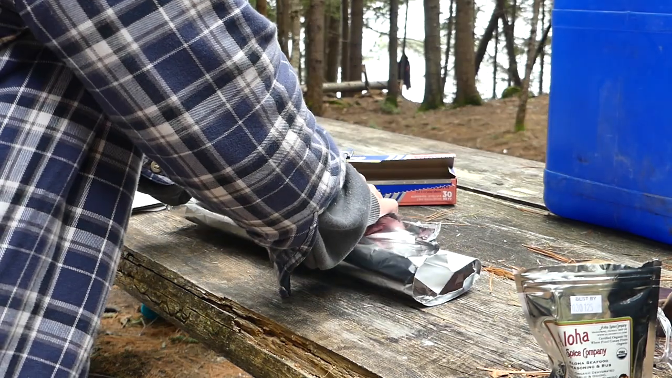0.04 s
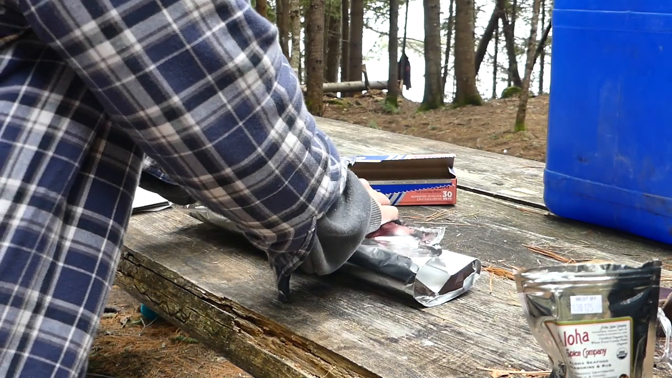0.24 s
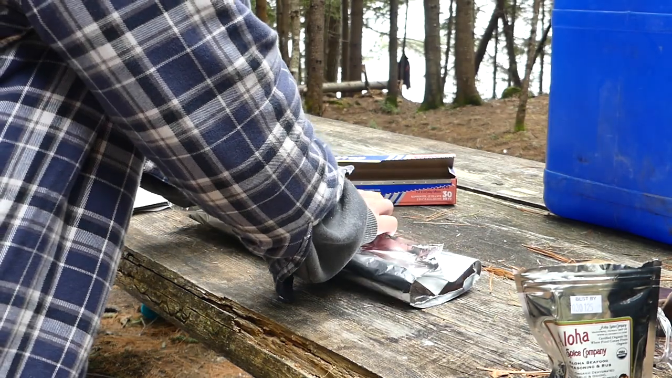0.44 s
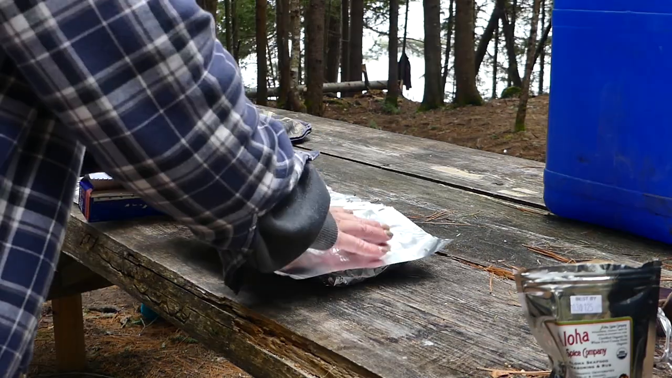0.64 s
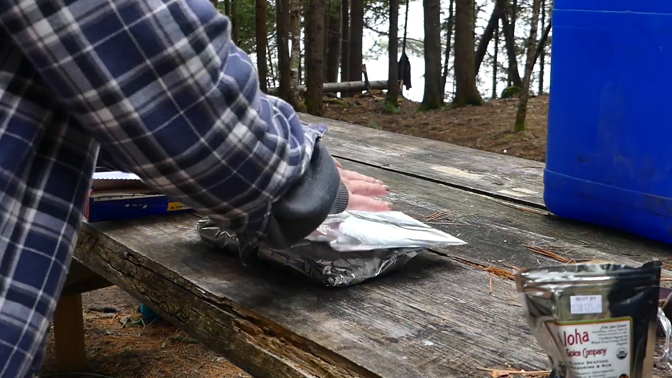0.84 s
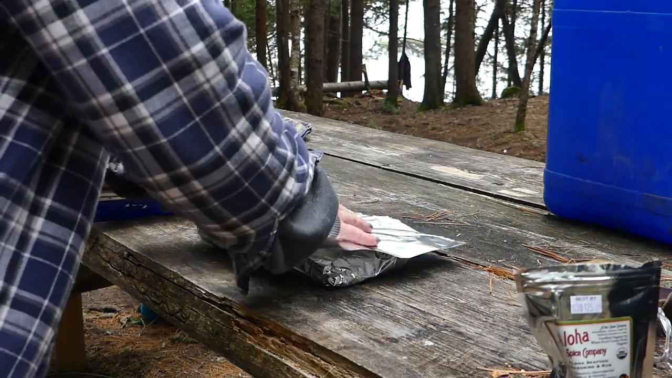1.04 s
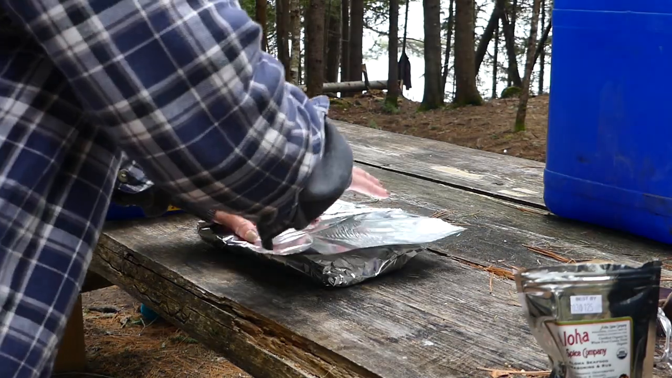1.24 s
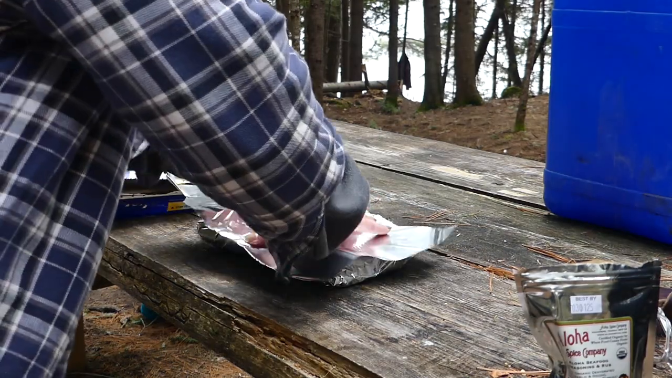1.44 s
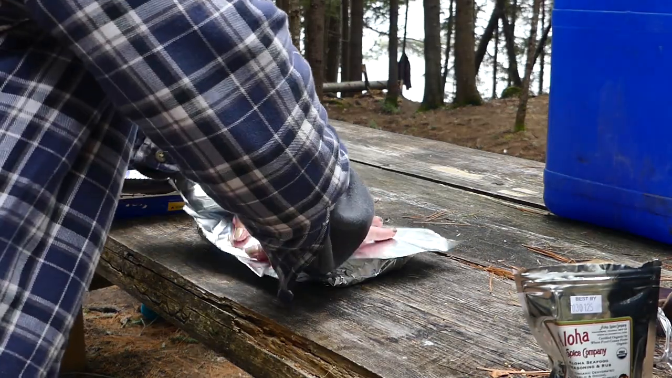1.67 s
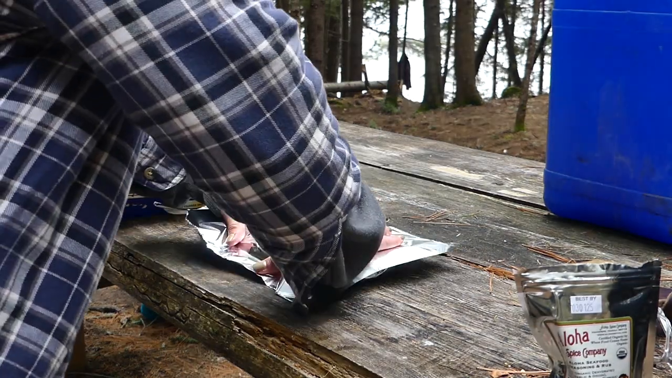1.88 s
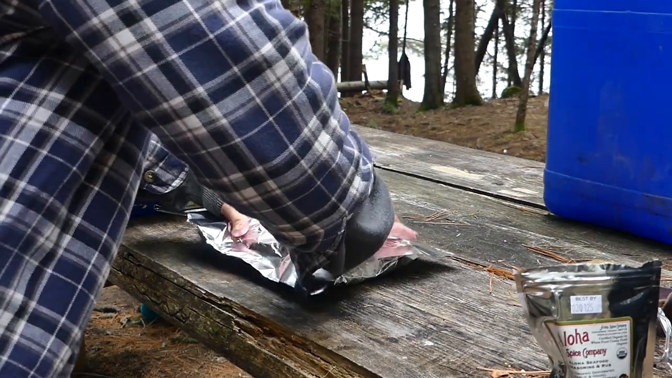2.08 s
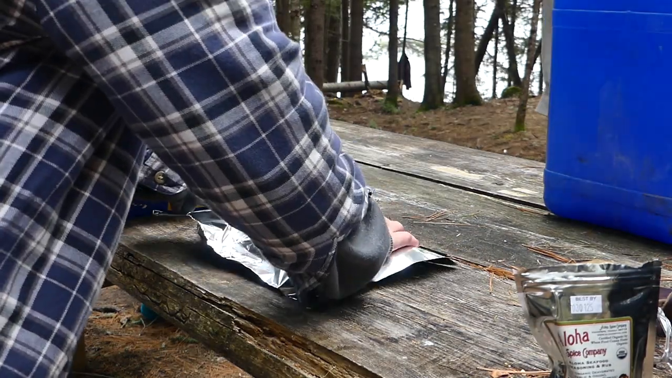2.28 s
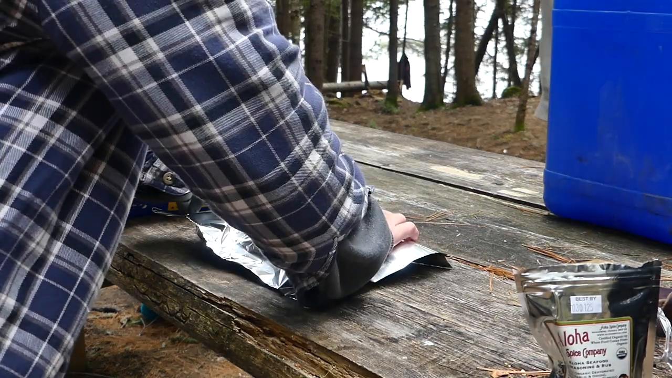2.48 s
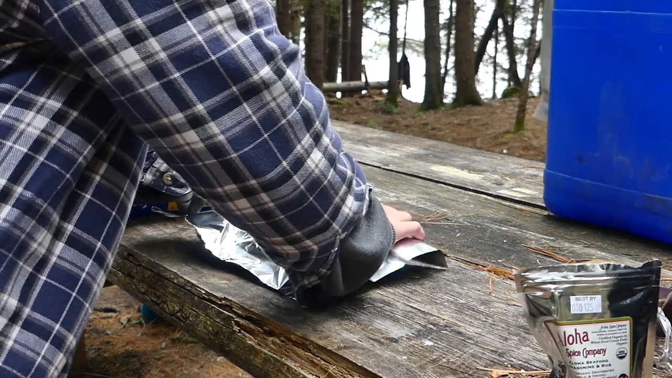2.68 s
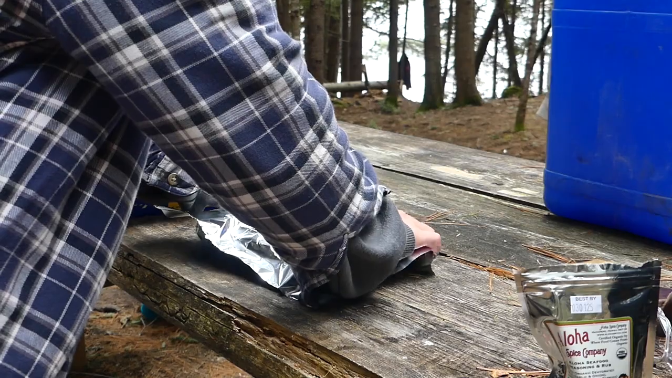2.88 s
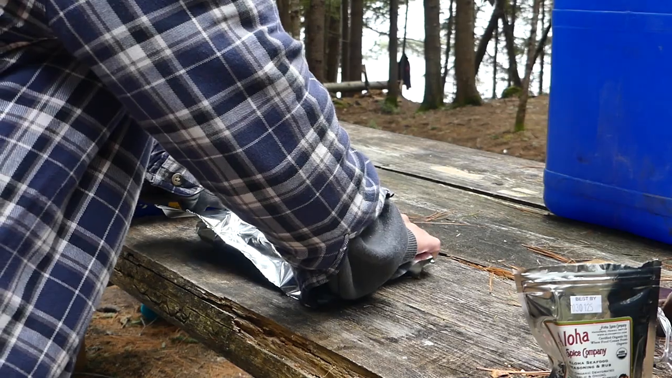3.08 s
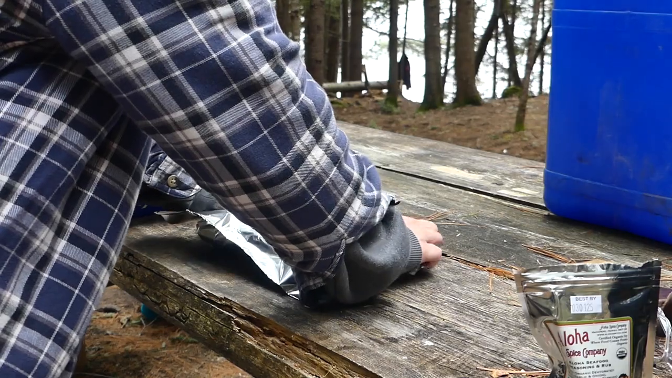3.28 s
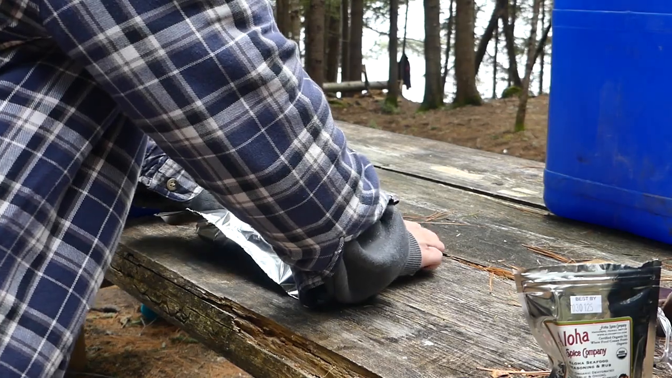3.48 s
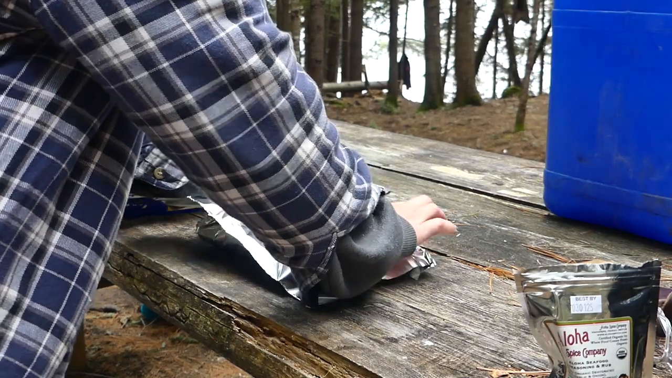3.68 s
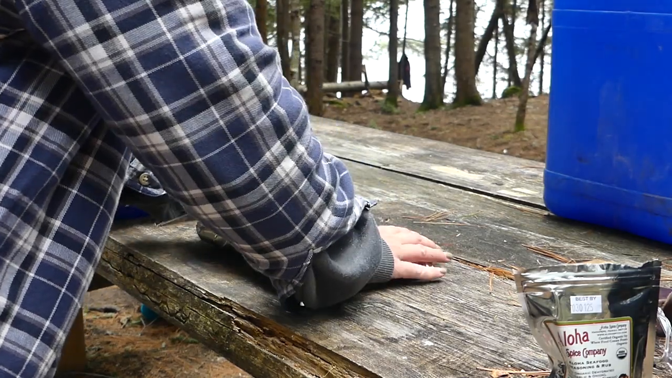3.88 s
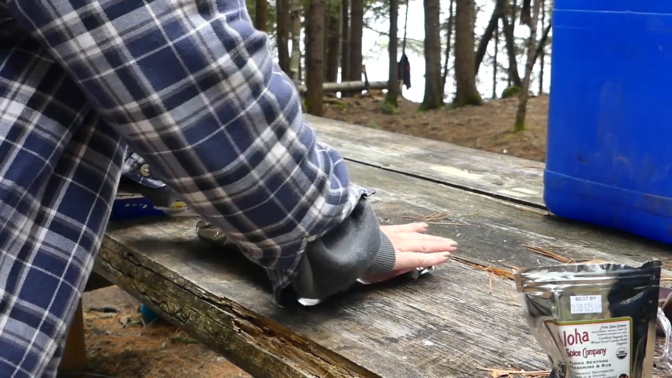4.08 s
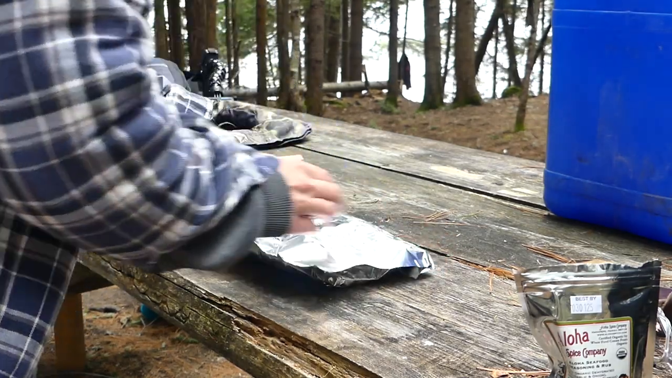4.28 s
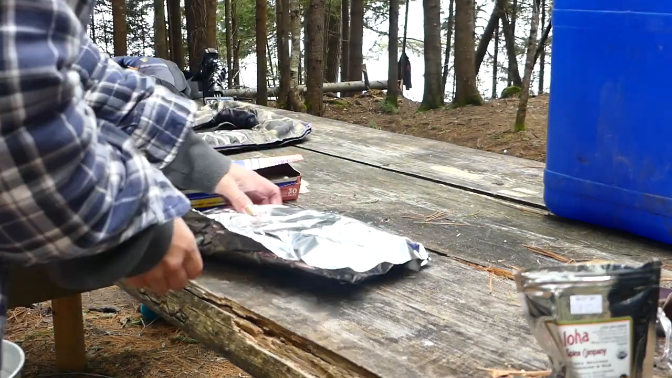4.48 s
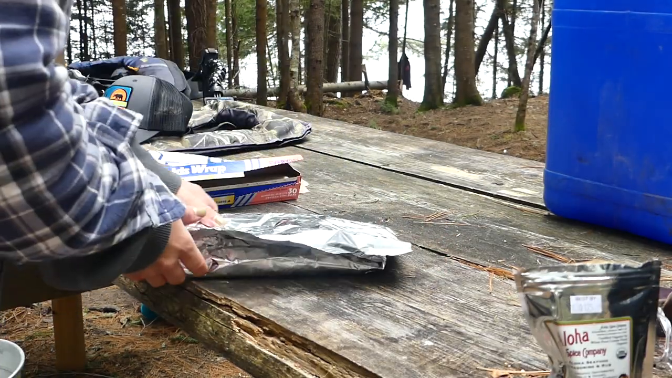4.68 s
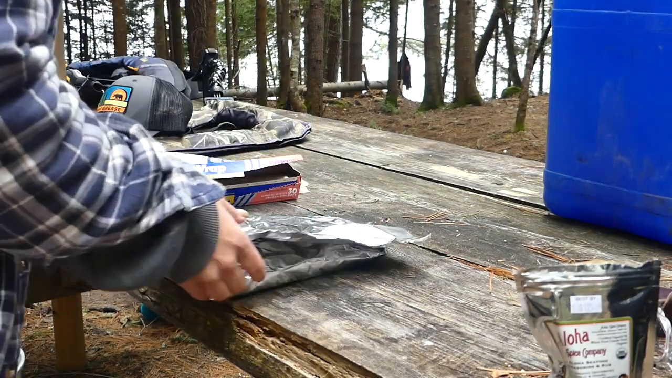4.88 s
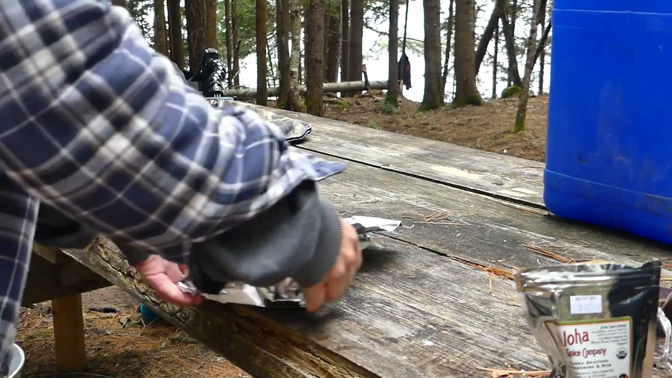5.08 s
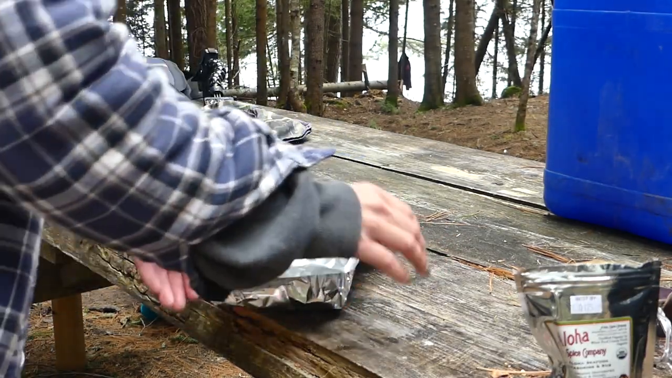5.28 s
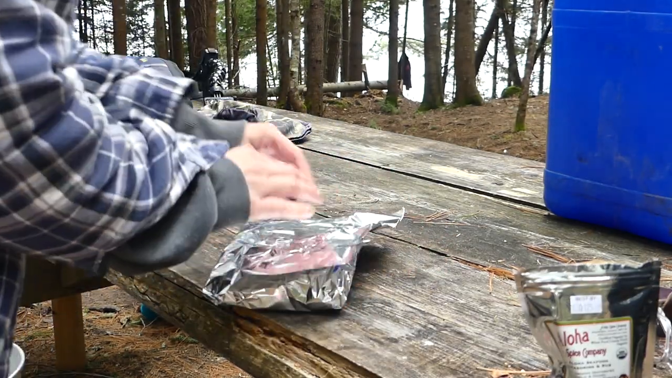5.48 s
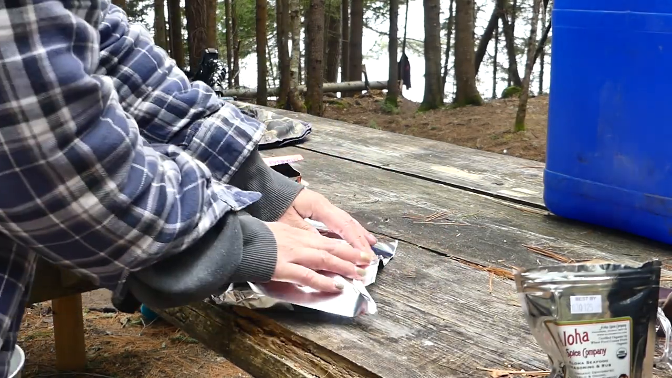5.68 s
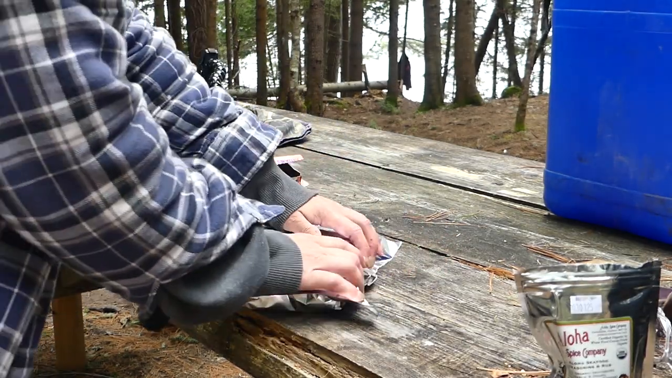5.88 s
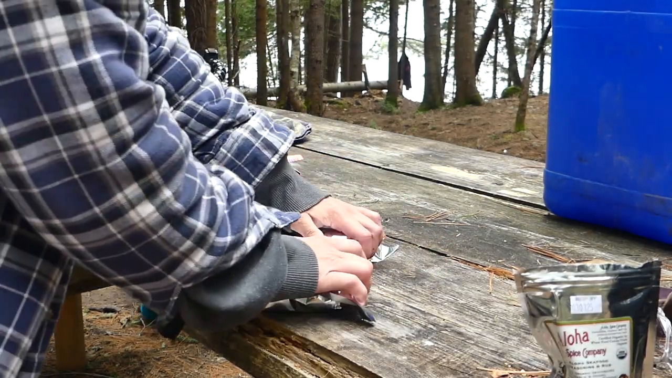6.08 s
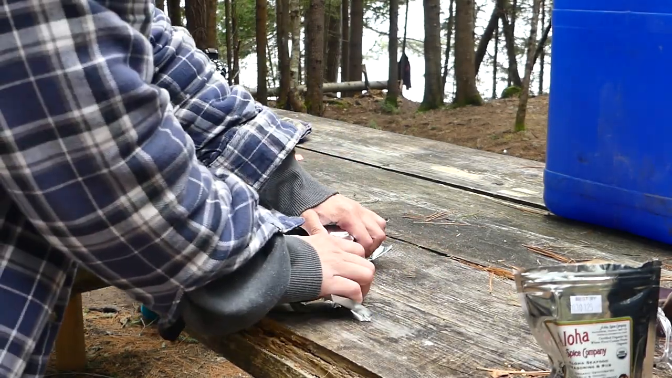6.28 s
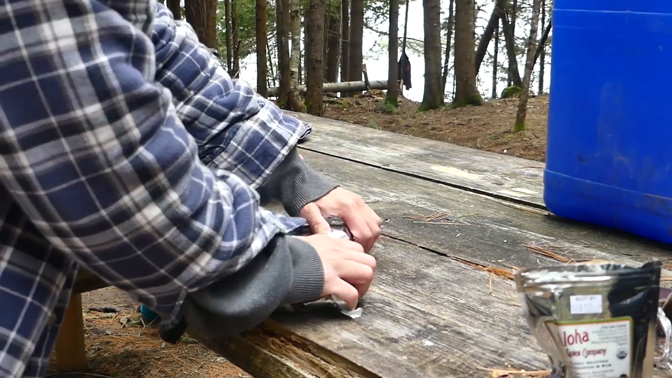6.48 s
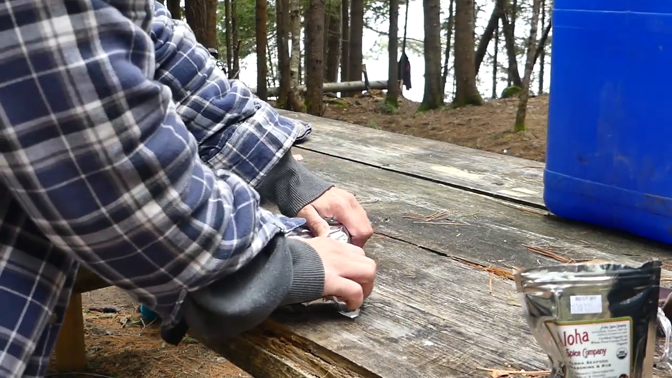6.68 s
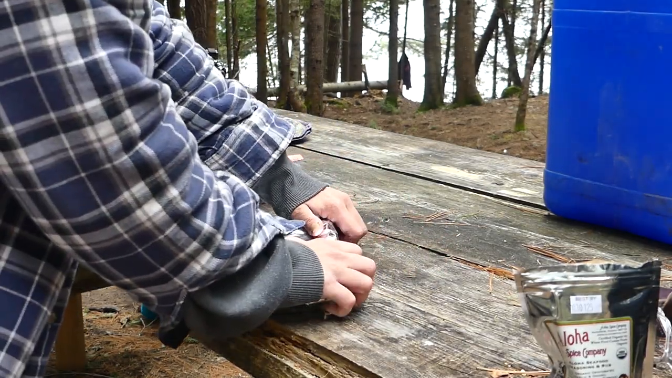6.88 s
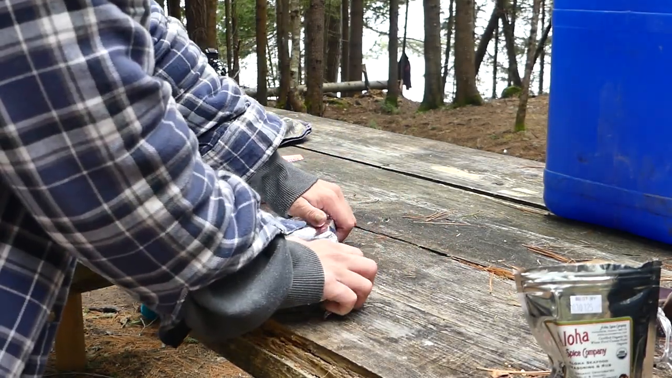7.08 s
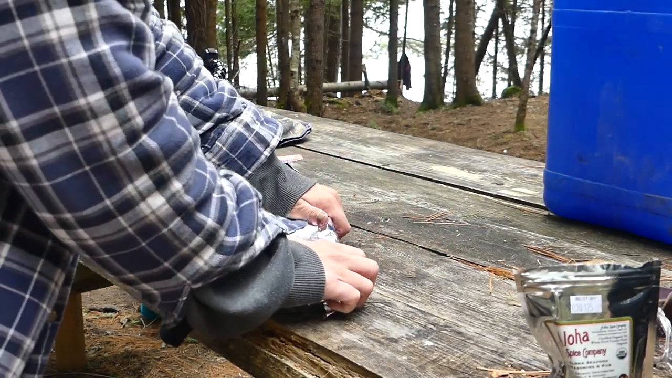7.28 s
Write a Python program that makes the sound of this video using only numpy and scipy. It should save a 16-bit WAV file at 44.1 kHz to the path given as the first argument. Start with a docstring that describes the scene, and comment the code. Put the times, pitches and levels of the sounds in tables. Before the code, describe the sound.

Close, bright foil crackling in short pushes, crisp crease snaps, a packet scraped over boards and knocked, then tight crimping among trees.

```python
"""A soft crinkle comes first, then sharp snaps: hands fold aluminium foil on a wooden table among trees.
Foil crackles by buckling: swarms of tiny rattles and facet rings, with a hiss where it slides.
Creases snap as short noise bursts, kinks tick, panels pop at a pitch, and a tight crimp squeaks.
The packet scrapes and knocks on the table; the boards thud softly under the leaning arms.
Sleeves brush as filtered noise, the trees return a faint diffuse echo, and open air murmurs very faintly."""
import sys
import numpy as np
from scipy import signal
from scipy.io import wavfile
from scipy.ndimage import uniform_filter1d

SR = 44100
rng = np.random.default_rng(int(sys.argv[2]) if len(sys.argv) > 2 else 0)


def log_audio(samples):
    """Write samples as a 16-bit WAV file to the path given in sys.argv[1]."""
    # one column per channel
    frames = np.atleast_2d(samples).T
    # limit to full scale, then quantise
    limited = np.clip(frames, -1, 1)
    pcm = np.round(limited * 32767).astype(np.int16)
    wavfile.write(sys.argv[1], SR, pcm)


N = 323694
TIME = np.arange(N) / SR  # [s]

# Open air, spectrum: (frequency [Hz], level [dB])
AIR_SPECTRUM = [(20, -4), (80, -11.5), (200, 25), (400, 14), (800, 19.5), (1500, 0), (3000, -71),
                (8000, -106), (16000, -19)]
AIR_DB = -81
# Flannel sleeves brushing as the arms move: (time [s], level [dB])
SLEEVE_LEVEL = [(0, -54), (.45, -53), (.55, -52), (.85, -54.5), (1.08, -48.5), (1.4, -57), (1.72, -45),
                (2.0, -51), (2.3, -50.5), (2.8, -53.5), (3.7, -52.5), (3.9, -52.5), (4.3, -52), (5.2, -55),
                (5.36, -51), (5.5, -47.5), (5.7, -52.5), (6.5, -51), (7.34, -52.5)]
# Flannel, spectrum: (frequency [Hz], level [dB])
SLEEVE_SPECTRUM = [(30, -14), (90, -12), (160, 1), (280, 2), (450, 0.5), (800, -1.5), (1400, -2.5),
                   (2500, -9), (8000, -27), (16000, -61)]
# Reverberation among the trunks: (frequency [Hz], 60 dB decay time [s])
WOODS_DECAY = [(100, 1), (1000, 0.42), (4000, 0.18), (8000, 0.08), (16000, 1)]
# Hands leaning on the table: (time of greatest weight [s], width between 1/e points [s], level [dB])
TABLE_LEANS = [(.59, .16, -51), (1.375, 0.54, -52), (2.12, 0.27, -55), (2.6, .5, -61), (3.2, 0.38, -55.5),
               (3.63, 0.3, -56), (4.2, 0.75, -50), (4.72, 0.42, -51), (5.076, .1, -50), (5.354, 0.22, -53),
               (5.68, 0.19, -45.5), (6.102, 0.42, -48.5), (6.303, .18, -53), (6.82, 0.63, -46.5),
               (7.3, 0.19, -55)]
RESTING_DB = -72.5  # the boards under the resting arms
# Table top, spectrum: (frequency [Hz], level [dB])
TABLE_SPECTRUM = [(10, -22), (25, -4), (37, 0), (50, -6), (62, -7.5), (90, -14), (160, -22), (400, -34),
                  (2000, -70)]
# Packet dragged over the boards: (time [s], level [dB])
DRAG_LEVEL = [(3.95, -54), (4.3, -48), (4.42, -35), (4.52, -39), (4.62, -29.5), (4.87, -31.5), (4.91, -51),
              (4.98, -34), (5.1, -36.5), (5.22, -48)]
# Hollow resonances of the packet: (frequency [Hz], bandwidth [Hz], level [dB])
HOLLOW_MODES = [(866, 22, 0), (1130, 15, -4), (1243, 28, 2), (1324, 48, 7), (1390, 64, 6), (1477, 55, 4),
                (1580, 120, -8), (1960, 72, -4)]
# Packet's edge striking the table: (time [s], chatter level [dB], contact length [s], decay [s])
EDGE_KNOCK = (5.2985, -9.5, .0026, .0006)
# Chatter of the knock, spectrum: (frequency [Hz], level [dB])
CHATTER_SPECTRUM = [(100, -36), (800, -16), (1800, -4), (2500, 2), (3700, -5), (5000, 2), (8300, -3),
                    (10500, -11), (13500, -9), (16000, -22)]
# First dull push of the knock, spectrum: (frequency [Hz], level [dB])
PUSH_SPECTRUM = [(30, -16), (200, 0), (450, -3), (1300, -2), (2200, -8), (5000, -30), (16000, -50)]
# Foil catching on foil in a tight crimp: (time [s], level [dB], fall to 1/e [s])
CRIMP_SQUEAKS = [(6.792, -19, .003), (6.802, -21, 0.0092), (6.811, -12.5, 0.0034), (6.814, -14, 0.011),
                 (6.827, -24, .009)]
# Squeaks, spectrum: (frequency [Hz], level [dB])
SQUEAK_SPECTRUM = [(100, -48), (4000, -22), (5800, -10), (6650, 3), (7400, -7), (8300, -8.5), (9500, -21),
                   (12500, -13), (16000, -20)]
# Wide panels popping through: (time [s], level before trim [dB], pitch [Hz])
PANEL_POPS = [(0.267, -36, 1320), (.362, -26, 1230), (0.402, -25.5, 1280), (2.4263, -18, 1950),
              (2.513, -28, 840), (2.54, -24, 2540), (2.727, -28, 704), (2.893, -25, 1440),
              (3.047, -23, 1980), (3.155, -28, 1350), (4.435, -19, 1460), (6.85, -23, 1350)]
# Hard clicks of sharp kinks: (time [s], peak before trim [dB])
KINK_TICKS = [(2.4262, -2.5), (3.048, -20), (3.256, -22), (3.447, -20), (3.469, -12), (3.489, -14),
              (3.54, -13), (6.0257, -14), (6.1245, -16), (6.343, -14), (6.52, -5.5)]
# One kink, spectrum: (frequency [Hz], level [dB])
TICK_SPECTRUM = [(100, -27), (500, -6), (900, 0), (2000, -5), (3500, -5), (6500, -1), (9000, -15),
                 (16000, -12)]
# Lesser kinks: median gain over the fine crinkle effort, before the sliding share reduces it
KINKS_PER_S, KINK_DB, KINK_SPREAD_DB = 26, 12.5, 1.5
# Creases snapping through: (time [s], level before trim [dB],
# low-mid colour before trim [dB], top colour before trim [dB])
CREASE_SNAPS = [(.136, -17, -28, -13), (.147, -8, -34, -9), (.21, -20, 0, -9), (.464, -25, -5, -18),
                (.511, -9.5, -22, -13), (.518, -5, -28, -7), (.938, -13, -22, -9), (1.243, -18.5, -20, -9),
                (1.467, -8.5, -19, -10), (1.807, -11.5, -28, -2), (1.916, -7, -15.5, -3),
                (2.029, -19, -11, -14), (2.224, -10, -27, -2), (2.4268, -11, -7, -15),
                (2.954, -16, -25, -11), (3.154, -20, -11, -10), (3.19, -15, -11, -7), (3.211, -18, -9, -10),
                (3.313, -19.5, -9, -3), (3.436, -19.5, -12, -12), (3.467, -18.5, -17, -15),
                (3.822, -21, -4, -11), (3.967, -16.5, -25, -13), (4.21, -22, -23, -11),
                (4.363, -15, -11, -13), (5.817, -11.5, -17.5, -13), (5.969, -15, -22, -22),
                (6.176, -14.5, -17, -12), (6.313, -11.5, -12.5, -11), (6.888, -19, -19, -16),
                (6.903, -16.5, -16, -8.5), (7.024, -16, -22, -15), (7.145, -12.5, -13, -10.5),
                (7.161, -12, -18, -12), (7.285, -14, -13, -9.5), (7.322, -25.5, -8, -30)]
SNAP_S = 0.0075  # the envelope falls to 1/e
# Share of smooth sliding against separate buckles: (time [s], share of power [0-1])
SLIDING_SHARE = [(0, 0.56), (.45, 0.2), (.55, 0.78), (1.1, 0.98), (1.3, 0.7), (1.7, 0.74), (2.0, 0.58),
                 (2.3, 0.76), (2.6, 0.37), (3.5, 0.41), (4.2, 0.46), (4.6, 0.95), (5.15, 0.57), (5.7, 0.62),
                 (6.1, 0.54), (7.34, 0.48)]
# Small creases, spectrum: (frequency [Hz], level [dB])
CRINKLE_SPECTRUM = [(60, -51), (300, -19.5), (1000, -9), (2500, -9), (4300, -2.5), (5800, -4), (7100, 2.5),
                    (8200, 2), (8900, -4.5), (10000, -5), (12500, -3.5), (14800, -7.5), (15900, -7)]
# Whole panels of foil, spectrum: (frequency [Hz], level [dB])
PANEL_SPECTRUM = [(40, -31), (130, -19.5), (300, -11.5), (500, -7), (680, -2.5), (830, -0.5), (970, -5.5),
                  (1350, -0.5), (1900, -1), (2600, -3), (4300, -5.5), (7000, -17.5), (16000, -16)]
# Pushes of the hands: (start [s], rise [s], length [s],
# fine crinkle before trim [dB], flexing panels before trim and damping [dB])
HAND_STROKES = [ (0.0, 0.012, 0.12, -35.5, -35.5), (0.113, 0.032, 0.031, -26, -26),
                (.205, 0.0089, 0.16, -36, -36), (0.31, 0.032, 0.095, -32.5, -35),
                (.503, 0.0085, .05, -21.5, -34), (0.538, 0.021, 0.043, -19, -34),
                (0.597, 0.036, 0.18, -30.5, -45.5), (0.892, 0.096, .19, -22.5, -32.5),
                (1.098, .02, 0.092, -30.5, -39), (1.234, 0.024, .04, -31, -38),
                (1.31, 0.07, 0.36, -33.5, -42), (1.412, 0.057, .1, -24, -35), (1.66, 0.026, .1, -24.5, -31),
                (1.78, 0.016, 0.17, -28.5, -34), (1.948, 0.017, 0.2, -33.5, -39.5),
                (2.131, .1, .16, -26, -32), (2.294, 0.043, .19, -31, -31.5), (2.499, .02, 0.14, -35, -37),
                (2.698, 0.024, 0.12, -33, -35.5), (2.82, 0.016, 0.095, -33, -35),
                (2.94, 0.0092, .19, -35, -35.5), (3.137, 0.017, 0.19, -36, -36), (3.35, .02, 0.1, -42, -42),
                (3.502, 0.0073, 0.07, -36.5, -36.5), (3.616, 0.028, 0.29, -38.5, -39.5),
                (3.814, 0.025, 0.074, -31, -32.5), (3.903, 0.037, 0.087, -34, -37),
                (4.023, .015, 0.074, -37, -41), (4.203, .008, 0.017, -35, -44),
                (4.275, 0.035, 0.064, -35, -40), (4.355, .045, 0.25, -29.5, -32.5),
                (4.514, 0.1, 0.25, -22, -22.5), (4.769, 0.046, 0.11, -24.5, -23.5),
                (4.881, 0.11, 0.21, -31.5, -25.5), (5.1, 0.043, 0.089, -34, -32.5),
                (5.265, .006, 0.058, -40.5, -44.5), (5.566, .008, 0.05, -37.5, -46),
                (5.6, 0.068, 0.12, -24.5, -33), (5.758, 0.05, 0.15, -29, -34.5),
                (5.921, 0.024, .1, -29, -35), (6.018, 0.037, .11, -28.5, -33),
                (6.156, 0.011, 0.18, -31.5, -36.5), (6.289, 0.12, .18, -28, -31),
                (6.49, .03, 0.055, -27.5, -32.5), (6.587, 0.021, 0.081, -38, -41),
                (6.658, 0.065, 0.18, -28, -32), (6.914, 0.066, .09, -30.5, -31),
                (7.103, 0.023, .14, -34, -37)]
SAG_DB_PER_S, RELEASE_S = 15.5, 0.029  # a push eases as the foil gives way; the sheet settles after it
# Hands on the packet: (from [s], to [s])
HOLDING_TIMES = [(0, 5.25), (5.578, 9.3)]
HOLDING_CRINKLE_DB, HOLDING_PANELS_DB = -48, -44  # rustle between pushes, before the same adjustments
LET_GO_S, LET_GO_DB, SETTLE_DB_PER_S = 5.3, -38, 136  # freed foil rustles on and fades
NOTCH_HZ, NOTCH_Q, EDGE_HZ = 5910, 62, 15760  # narrow dip and upper band limit


def amp(db):
    """Level law: converts decibels to an amplitude gain."""
    return 10 ** (np.asarray(db) / 20)


def unit(x):
    """Normalisation by mean power: scales to rms 1."""
    return x / np.sqrt(np.mean(x ** 2) + 1e-20)


def read(points, hz):
    """Logarithmic frequency scale: interpolates a table of values along it."""
    f, value = np.transpose(points)
    return np.interp(np.log(hz + 1), np.log(f + 1), value)


def curve(rows, outside=None):
    """Linear interpolation: gives a control table at every sample."""
    return np.interp(TIME, *np.transpose(rows), outside, outside)


def add(mix, s, sound):
    """Superposition: adds a sound into the mix at time s."""
    part = mix[max(round(s * SR), 0):][:len(sound)]
    part += sound[:len(part)]


def colour(x, points, size=4096):
    """Minimum-phase filtering: a causal filter of the given spectrum keeps attacks sharp."""
    gain_db = read(points, abs(np.fft.fftfreq(size, 1 / SR)))
    log_gain = np.log(amp(gain_db))
    # the Hilbert transform of the log gain supplies the phase
    response = np.exp(np.conj(signal.hilbert(log_gain)))
    taps = np.fft.ifft(response).real
    return signal.oaconvolve(x, taps / np.linalg.norm(taps))[:len(x)]


def steadied(x, size):
    """Local power normalisation: evens the level over size samples and keeps the faster grain."""
    window = np.hanning(size)
    power = abs(signal.oaconvolve(x ** 2, window / window.sum(), "same"))
    return x / np.sqrt(power + 1e-9)


def burst(envelope):
    """Amplitude modulation: shapes an even, random-signed rattle by an envelope."""
    return envelope * steadied(rng.standard_normal(len(envelope)), size=65)


def cascade(t, length_s):
    """Gaussian envelope: holds for an instant, then dies fast."""
    return np.exp(-(t / max(length_s, 1e-4)) ** 2)


def slips(per_s, decay_s, smooth_share):
    """Stick-slip friction: each slip starts at once and its power decays exponentially."""
    jumps = (rng.random(N) < per_s / SR) * rng.random(N) ** 2
    power = signal.lfilter([1], [1, -np.exp(-1 / (decay_s * SR))], jumps)
    return steadied(np.sqrt(power / power.mean() + abs(smooth_share)), size=3001)


def wide_noise(spectrum, side_db):
    """Partial interaural coherence: noise of rms about 1, a little different at each ear."""
    mid, side = (steadied(colour(rng.standard_normal(N), spectrum), size=8001) for _ in range(2))
    return mid + amp(side_db) * side * np.array([[1], [-1]])


def air():
    """Low filtered noise: the steady, very faint, dull murmur of open air."""
    return amp(AIR_DB) * wide_noise(AIR_SPECTRUM, side_db=-11)


def sleeves():
    """Dry friction of fibres: the dull brush of flannel is noise that swells and fades."""
    return amp(curve(SLEEVE_LEVEL)) * wide_noise(SLEEVE_SPECTRUM, side_db=-17)


def woods(x, echo_db=-17, side_db=-7, side_hz=2000):
    """Diffuse scattering: echoes from the trunks decay at a rate set by frequency."""
    hz, t, z = signal.stft(rng.standard_normal((2, SR // 2)), SR, nperseg=256)
    decay = amp(-60 * t / read(WOODS_DECAY, hz)[:, None])
    arrived = t > .008  # no echo before 8 ms
    tails = signal.istft(z * decay * arrived, SR, nperseg=256)[1]
    mid, side = (signal.oaconvolve(x, tail / np.linalg.norm(tail))[:N] for tail in tails)
    side = signal.lfilter(*signal.butter(1, side_hz, fs=SR), side)  # the treble spreads least
    return amp(echo_db) * (mid + amp(side_db) * side * np.array([[1], [-1]]))


def table(level_db=0):
    """Forced vibration of boards: low, soft thudding swells and fades with each lean."""
    leaning = sum(amp(db) * cascade(TIME - s, width / 2) for s, width, db in TABLE_LEANS)
    weight = amp(RESTING_DB) + leaning
    return amp(level_db) * weight * wide_noise(TABLE_SPECTRUM, side_db=-24)


def drag():
    """Friction-driven resonance: the grain of the boards scrapes the packet and rings its hollow."""
    scrape = rng.standard_normal(N) * slips(per_s=280, decay_s=.003, smooth_share=0.42)
    rings = np.zeros(N)
    for hz, width, db in HOLLOW_MODES:
        rings += amp(db) * signal.lfilter(*signal.iirpeak(hz, hz / width, SR), scrape)
    return unit(rings) * amp(curve(DRAG_LEVEL, outside=-200))


def knock():
    """Impact: the packet's edge pushes on the wood and chatters, and the foil shivers after it."""
    s, db, contact, decay = EDGE_KNOCK
    t, out = np.arange(4096) / SR, np.zeros(N)
    chatter = np.exp(-np.maximum(t - contact, 0) / decay)
    shiver = .3 * np.exp(-t / .006)
    rattle = burst(np.hypot(chatter, shiver))
    add(out, s, amp(db) * colour(rattle, CHATTER_SPECTRUM))
    push = colour(signal.unit_impulse(len(t)), PUSH_SPECTRUM)
    add(out, s, -1.3 * push)
    return out


def squeaks():
    """Stick-slip vibration: foil catches on foil in short bursts of shrill narrow noise."""
    t, out = np.arange(2048) / SR, np.zeros(N)
    for s, db, length in CRIMP_SQUEAKS:
        shrill = steadied(colour(rng.standard_normal(len(t)), SQUEAK_SPECTRUM), size=129)
        add(out, s, amp(db) * shrill * cascade(t, length))
    return out


def pops(level_db=0, ring_s=0.0032):
    """Snap-through with damped free vibration: a flat panel flips and rings for a few cycles."""
    t, out = np.arange(2048) / SR, np.zeros(N)
    for s, db, hz in PANEL_POPS:
        ring = np.sin(2 * np.pi * hz * t) * np.exp(-t / ring_s)
        add(out, s, amp(db + level_db) * ring)
    return out


def effort(column, holding_db):
    """Addition of powers: each push swells, eases as the foil gives, and dies away."""
    held = sum((TIME >= start) & (TIME <= end) for start, end in HOLDING_TIMES)
    power = amp(holding_db) ** 2 * held
    t = TIME[:SR // 2]
    add(power, LET_GO_S, amp(LET_GO_DB - SETTLE_DB_PER_S * t) ** 2)
    for start, rise, length, *levels_db in HAND_STROKES:
        swell = np.sin(np.pi / 2 * np.minimum(t / max(rise, 1e-3), 1)) ** 2
        ease = amp(levels_db[column] - SAG_DB_PER_S * np.maximum(t - rise, 0))
        release = np.exp(-np.maximum(t - length, 0) / RELEASE_S)
        add(power, start, (swell * ease * release) ** 2)
    return np.sqrt(power)


def ticks(level_db=0):
    """Impulse excitation: a kink jumps in one step; lesser ones go at random under the hands."""
    out, click = np.zeros(N), colour(signal.unit_impulse(512), TICK_SPECTRUM)
    click = click / abs(click).max()
    for s, db in KINK_TICKS:
        add(out, s, amp(db + level_db) * click)
    happens = rng.random(N) < KINKS_PER_S / SR
    lesser = happens * amp(KINK_DB + KINK_SPREAD_DB * rng.standard_normal(N))
    buckling = np.sqrt(1 - np.clip(curve(SLIDING_SHARE), 0, 1))
    lesser *= effort(column=0, holding_db=HOLDING_CRINKLE_DB) * buckling
    return out + signal.oaconvolve(lesser, click)[:N]


def snaps(level_db=-9, low_db=6, top_db=1):
    """Elastic snap-through: a crease flips over, dull from a wide panel, bright from a tight fold."""
    t, out = np.arange(2048) / SR, np.zeros(N)
    for s, db, low, top in CREASE_SNAPS:
        low, top = low + low_db, top + top_db
        spectrum = [(100, low - 26), (400, low - 11), (750, low), (1700, low + 1),
                    (3200, -10.0), (5800, -13.0), (7600, -3.5), (9500, top - 2), (14000, top)]
        add(out, s, amp(db + level_db) * colour(burst(cascade(t, SNAP_S)), spectrum))
    return out


def stall(depth_db=4.5, length_s=.014):
    """Elastic loading: the sheet holds still while stress builds up ahead of each snap."""
    t, loading = np.arange(2048) / SR, np.zeros(N)
    for s, *_ in CREASE_SNAPS:
        add(loading, s - t[-1], cascade(t, length_s)[::-1])
    return amp(-depth_db * np.minimum(loading, 1))


def grip(waver_db=1.5, waver_s=.04):
    """Slow random modulation: uneven finger pressure makes the crinkle waver a little."""
    knots = np.cumsum(waver_s * rng.uniform(.5, 1.5, size=1000))
    return amp(waver_db * np.interp(TIME, knots, rng.standard_normal(len(knots))))


def buckles(sizes, facet, low_hz, high_hz, decay_s, ring_s, ring_share, count):
    """Impulsive excitation of modes: a buckle rattles the sheet and rings one facet at its own pitch."""
    t, out, voices = np.arange(1024) / SR, np.zeros(N), []
    for hz in np.geomspace(low_hz, high_hz, count):
        rattle_s = decay_s * 2 ** rng.uniform(0.04, 1)  # up to twice decay_s
        rattle = unit(burst(np.exp(-t / rattle_s)))
        ring = unit(np.sin(2 * np.pi * hz * t) * np.exp(-t / ring_s))
        voices.append(rattle + ring_share * ring)
    for at in np.flatnonzero(sizes):
        add(out, at / SR, sizes[at] * voices[facet[at]])
    return steadied(out, size=3001)


def foil(per_s=700, spread_db=5, clump_db=1.5, crinkle_db=1, panels_db=0, damping_db=3, count=256):
    """Crackling noise: swarms of buckles and the hiss of sliding drive small creases and larger panels."""
    clumps = unit(uniform_filter1d(uniform_filter1d(rng.standard_normal(N), size=400), size=300))
    # strong buckles cluster together
    sizes = amp(spread_db * np.minimum(rng.exponential(1, N), 4) + clump_db * clumps)
    sizes *= (rng.random(N) < per_s / SR) * rng.choice([-1, 1], N)
    facet = rng.integers(0, count, N)
    slide = np.clip(curve(SLIDING_SHARE), 0, 1)
    grit = slips(per_s=270, decay_s=0.0048, smooth_share=1.0)
    small = buckles(sizes, facet, low_hz=3000, high_hz=14500,
                    decay_s=.0013, ring_s=.0045, ring_share=.45, count=count)
    large = buckles(sizes, facet, low_hz=550, high_hz=4500,
                    decay_s=.002, ring_s=.0055, ring_share=.45, count=count)
    dragging = amp(curve(DRAG_LEVEL, outside=-200))
    damped_db = damping_db * np.sqrt(dragging / dragging.max())  # panels pressed to the boards flex less
    layers = [(small, CRINKLE_SPECTRUM, crinkle_db, HOLDING_CRINKLE_DB),
              (large, PANEL_SPECTRUM, panels_db - damped_db, HOLDING_PANELS_DB)]
    out = np.zeros(N)
    for column, (crackle, spectrum, db, holding_db) in enumerate(layers):
        hiss = unit(colour(grit * rng.standard_normal(N), spectrum))
        crackle = steadied(colour(crackle, spectrum), size=3001)
        blend = np.sqrt(slide) * hiss + np.sqrt(1 - slide) * crackle
        out += amp(db) * effort(column, holding_db) * blend
    return out


def scene():
    """Superposition of sources: the packet lies straight ahead, its echoes and the background spread wide."""
    crinkling = foil() * grip() * stall()
    near = drag() + knock() + squeaks() + pops() + ticks() + snaps() + crinkling
    return air() + sleeves() + woods(near) + table() + near


def record(dry):
    """Band limitation: a narrow dip in the treble, full-scale clipping, then a steep low-pass."""
    dipped = signal.lfilter(*signal.iirnotch(NOTCH_HZ, NOTCH_Q, SR), dry)
    low_pass = signal.firwin(1023, EDGE_HZ, window=("kaiser", 9), fs=SR)
    return signal.oaconvolve(np.clip(dipped, -1, 1), low_pass[None], "same", axes=1)


dry = scene()
out = record(dry)
log_audio(out)
```